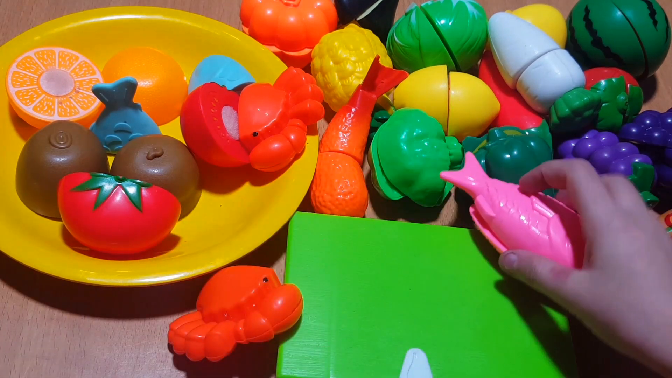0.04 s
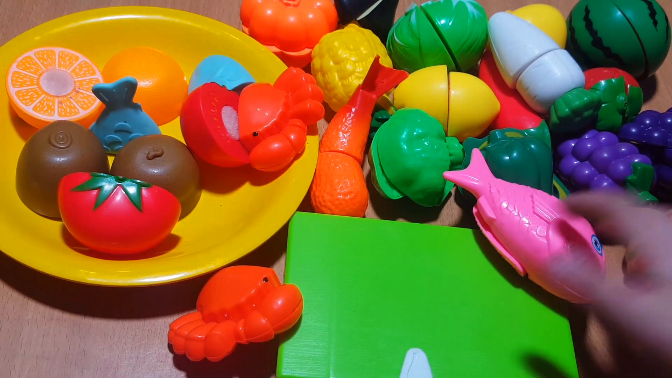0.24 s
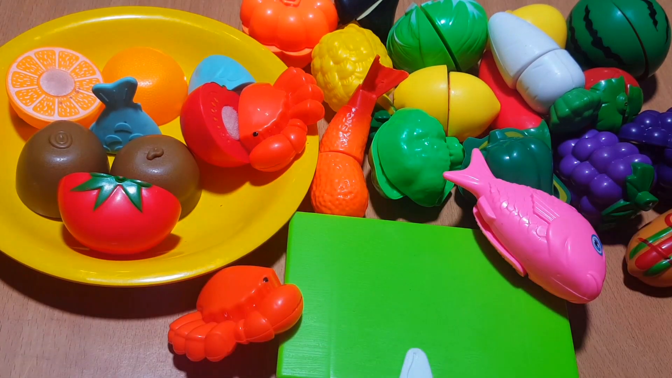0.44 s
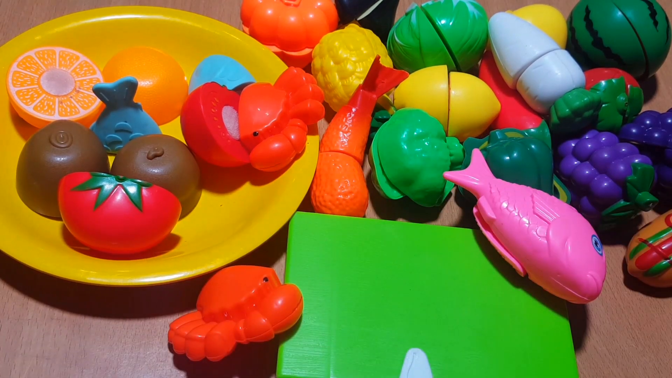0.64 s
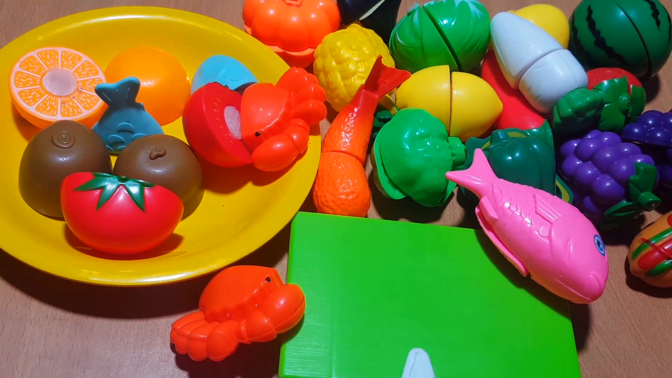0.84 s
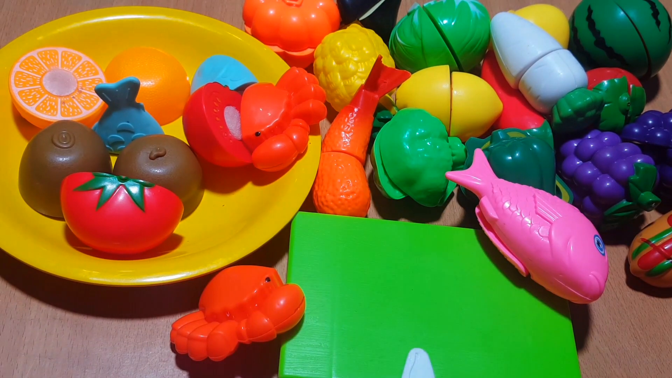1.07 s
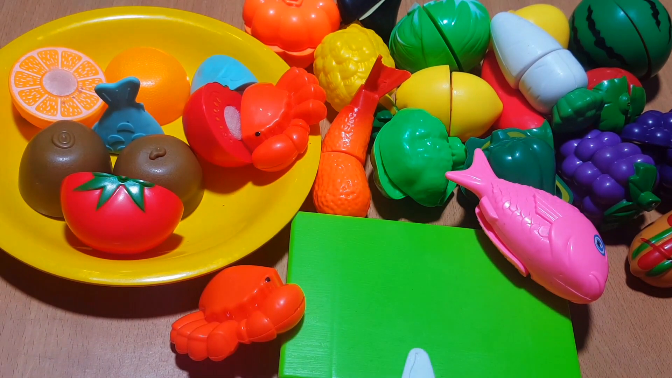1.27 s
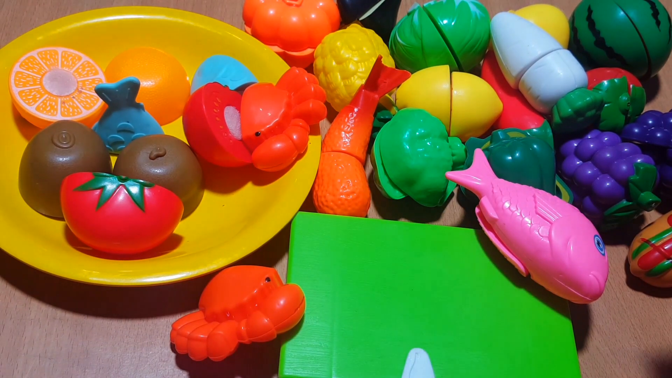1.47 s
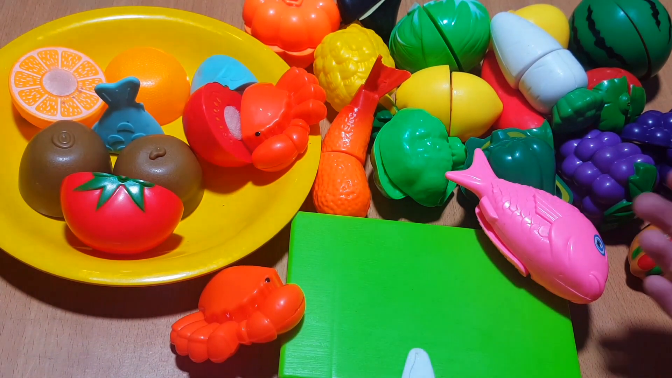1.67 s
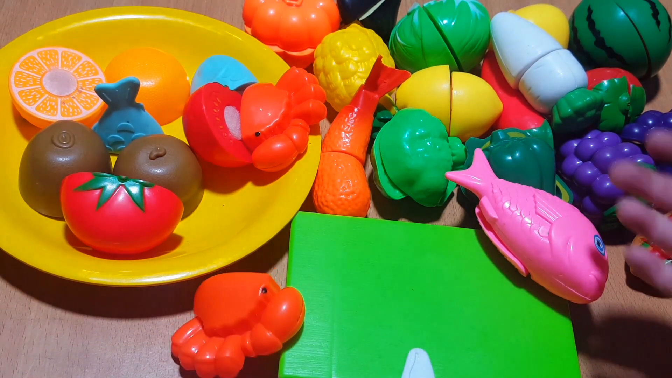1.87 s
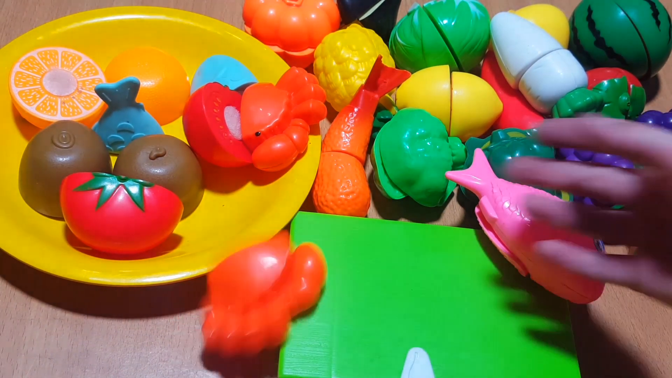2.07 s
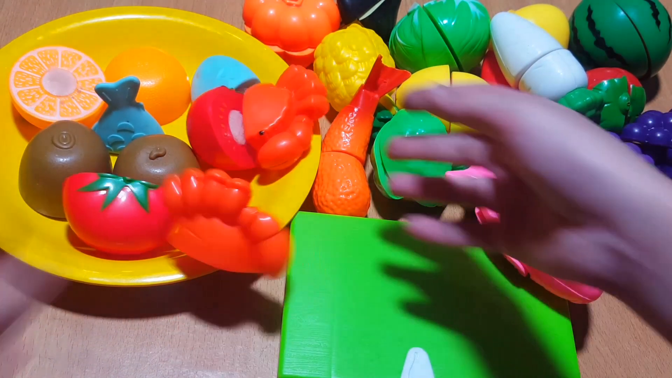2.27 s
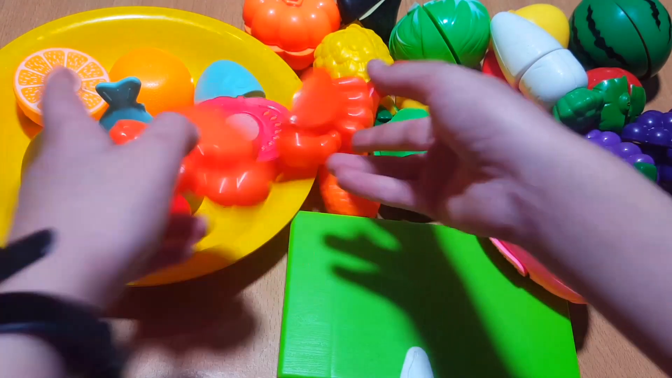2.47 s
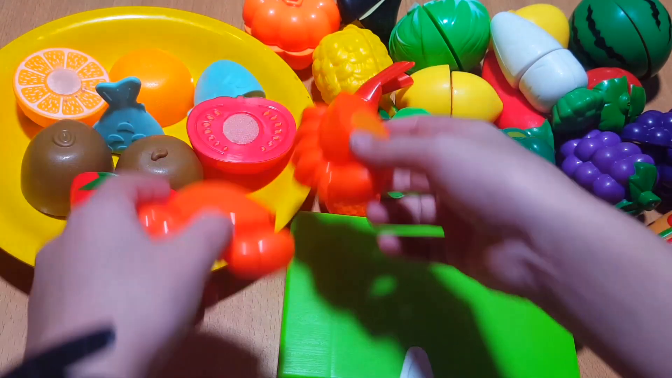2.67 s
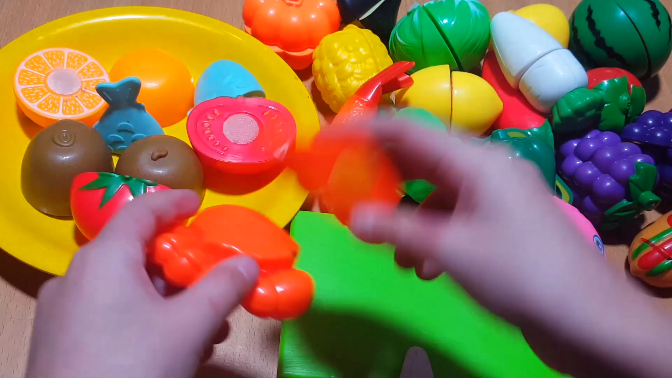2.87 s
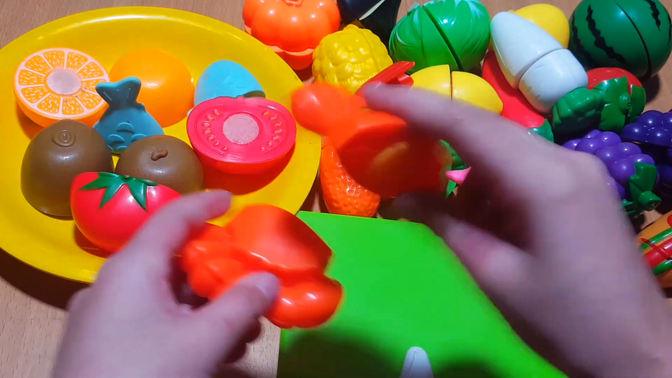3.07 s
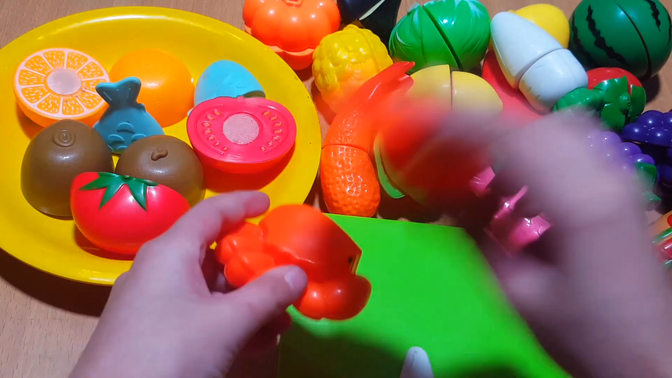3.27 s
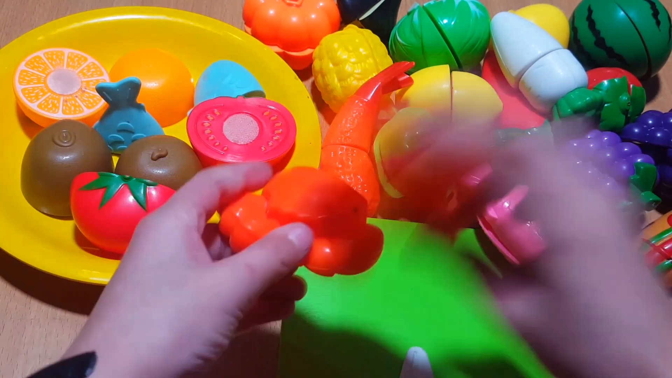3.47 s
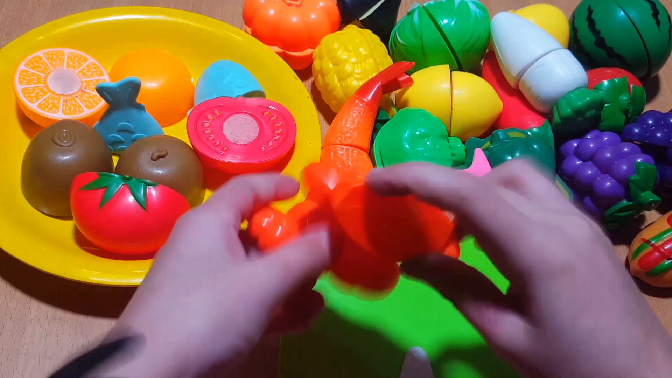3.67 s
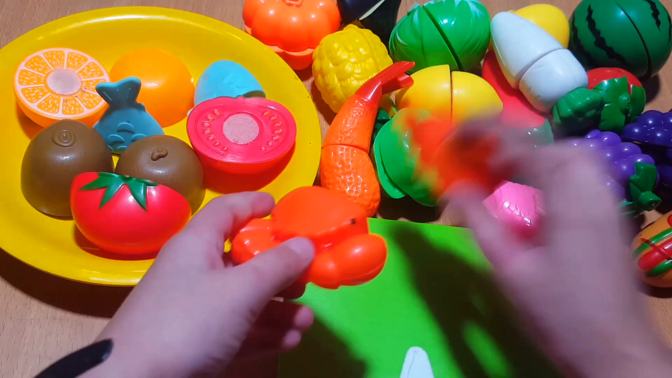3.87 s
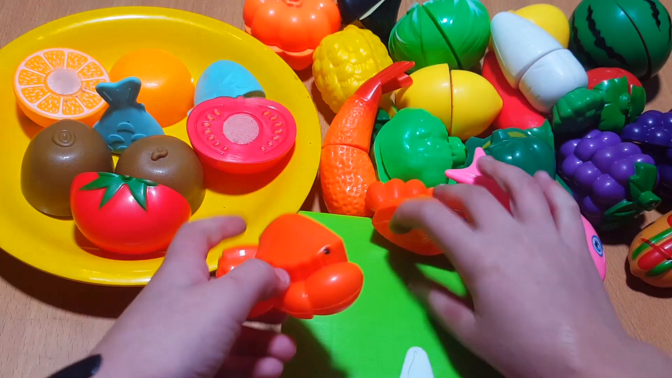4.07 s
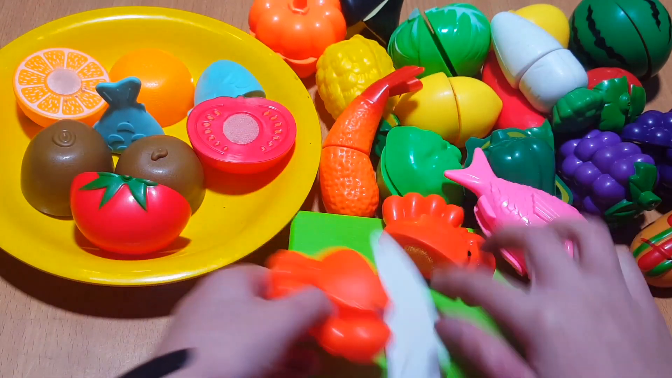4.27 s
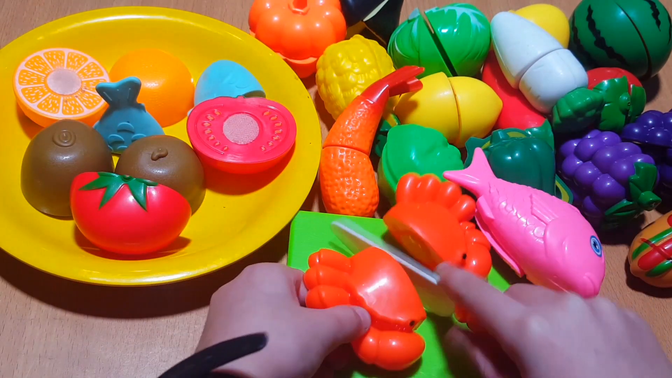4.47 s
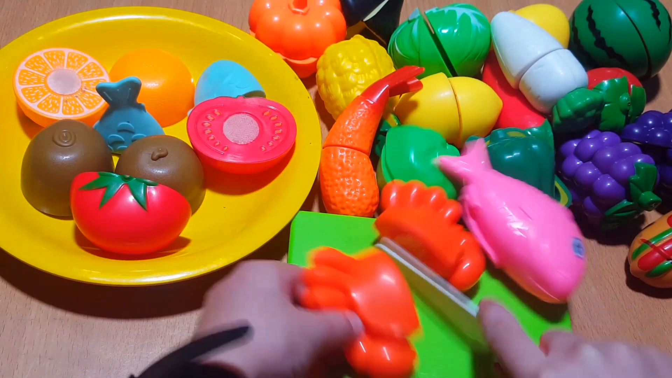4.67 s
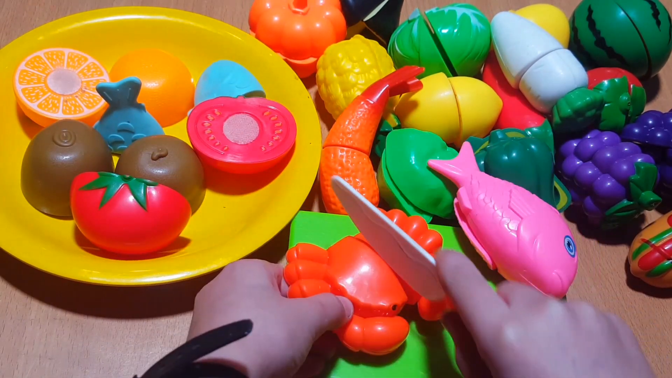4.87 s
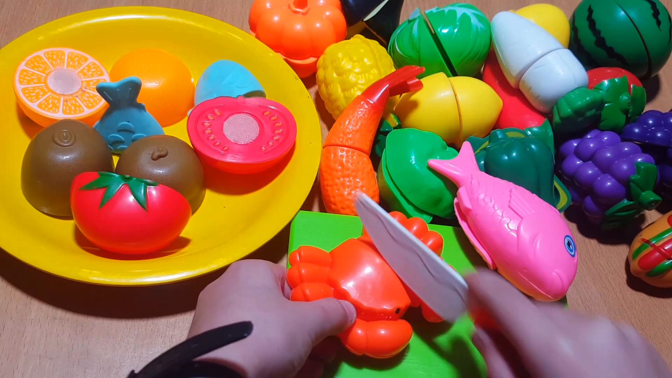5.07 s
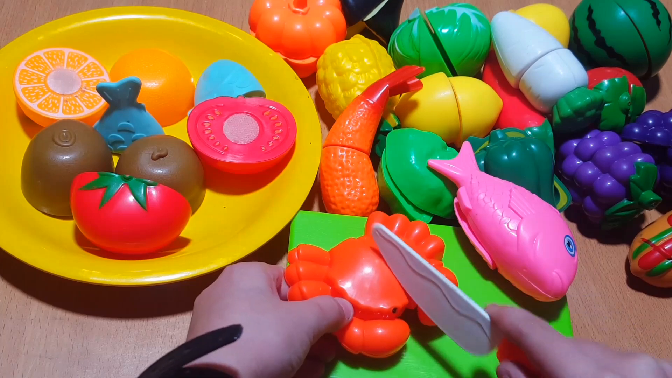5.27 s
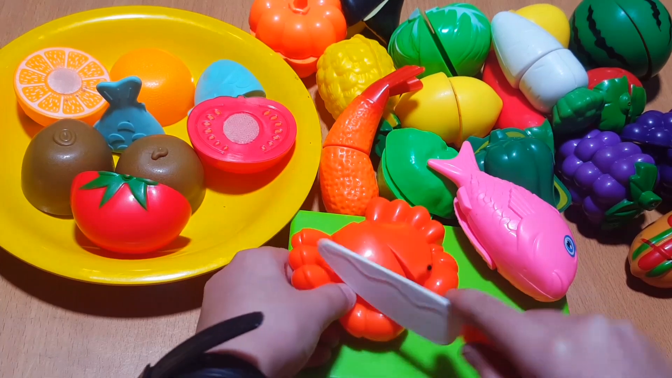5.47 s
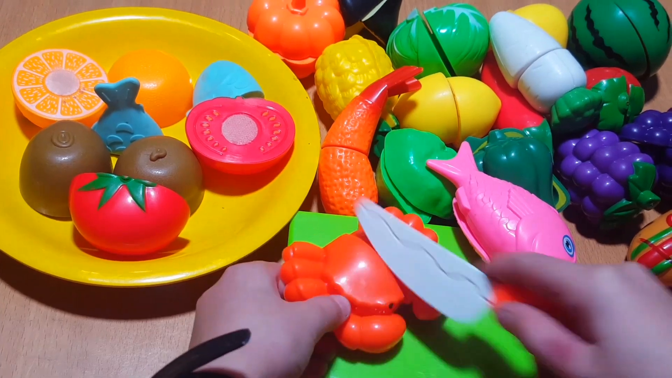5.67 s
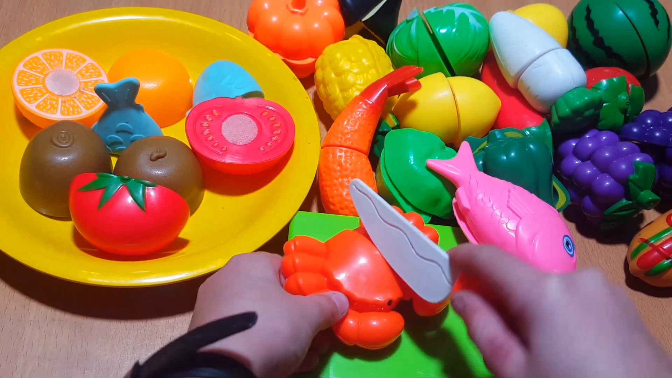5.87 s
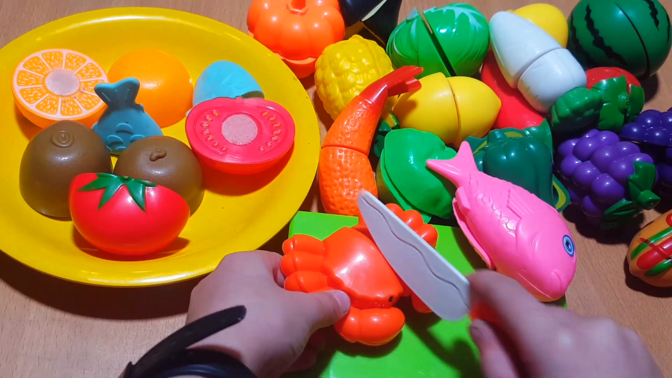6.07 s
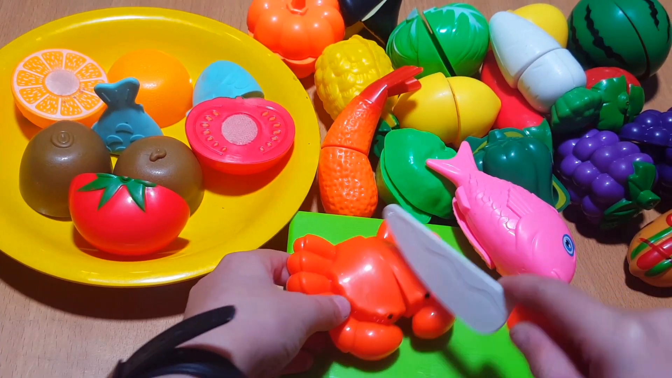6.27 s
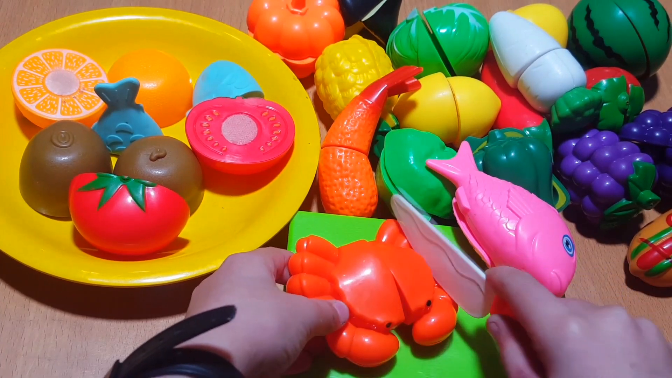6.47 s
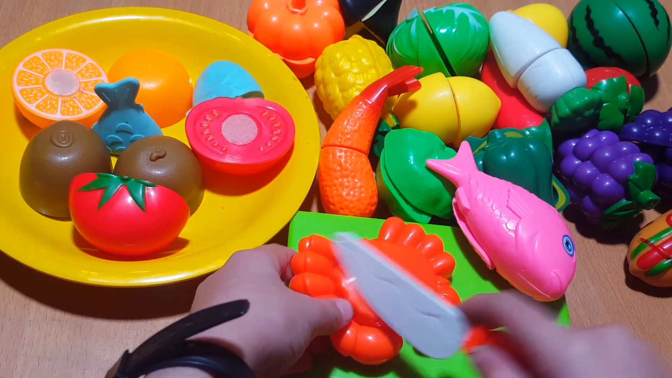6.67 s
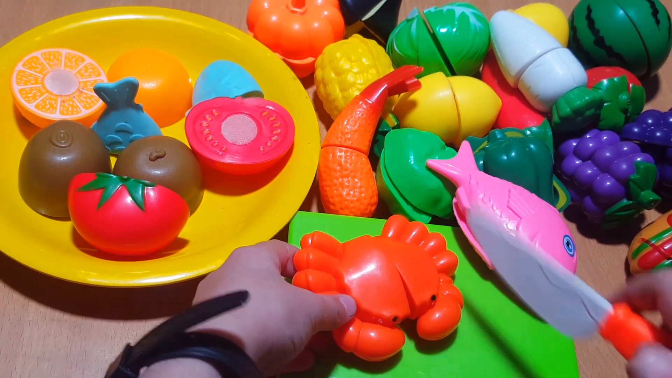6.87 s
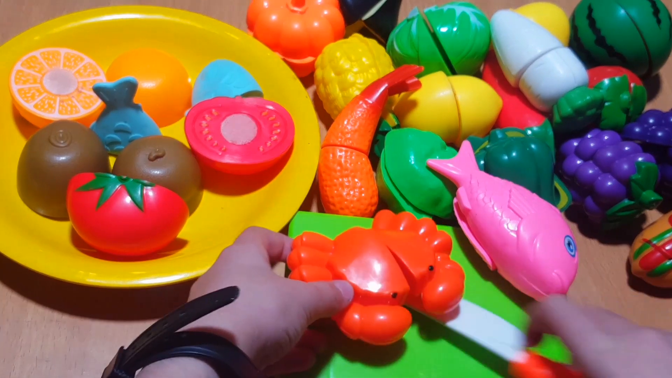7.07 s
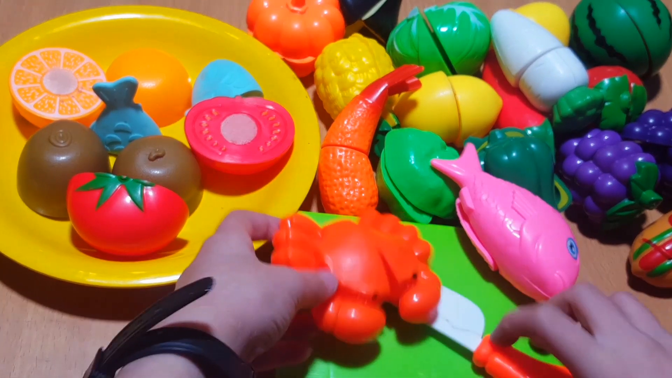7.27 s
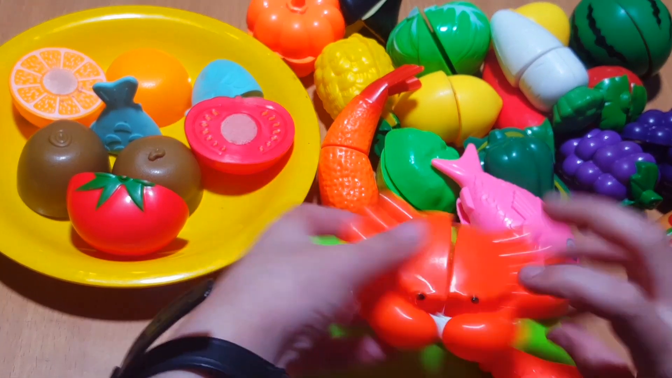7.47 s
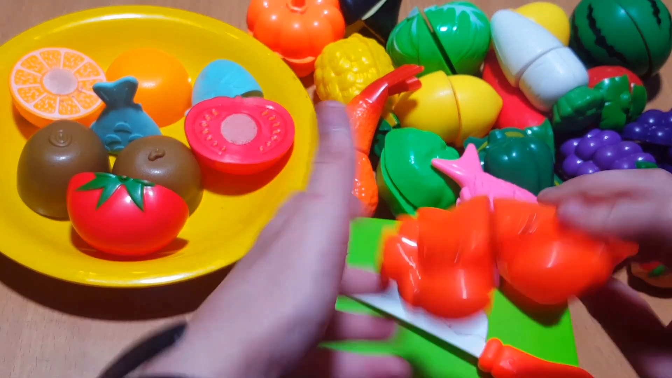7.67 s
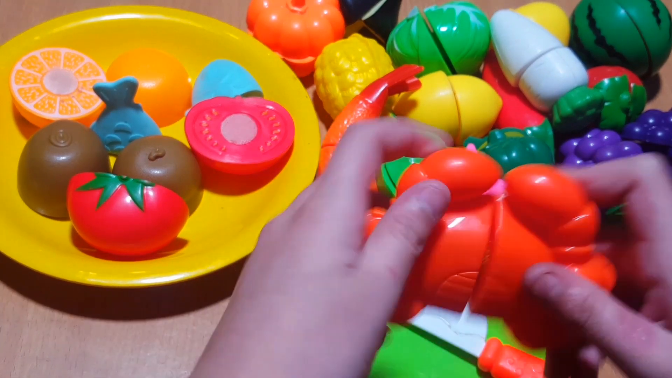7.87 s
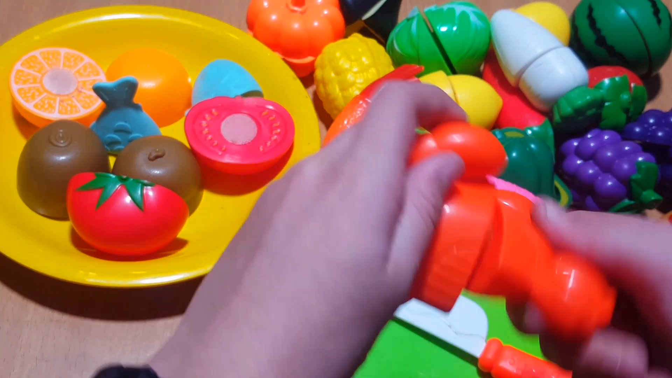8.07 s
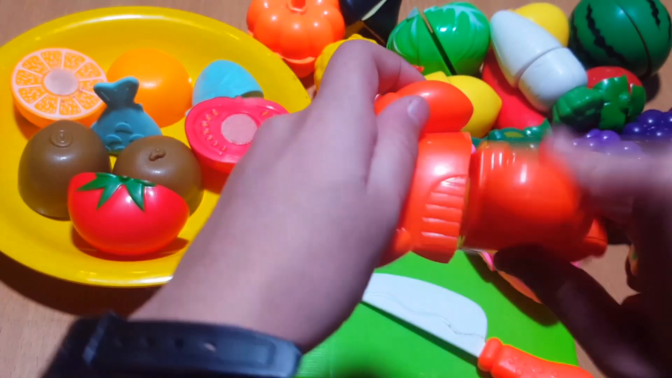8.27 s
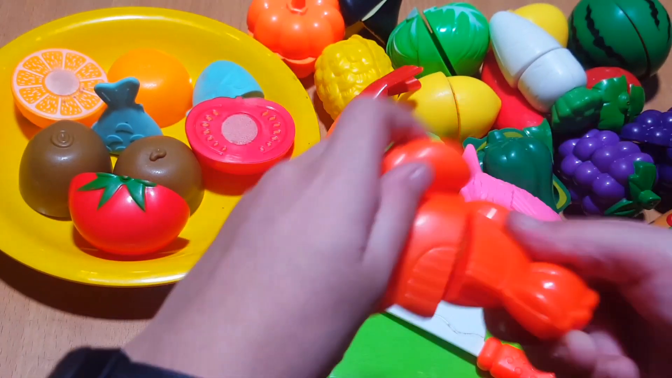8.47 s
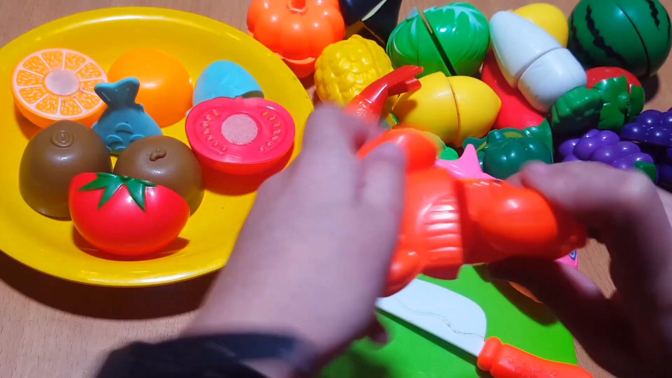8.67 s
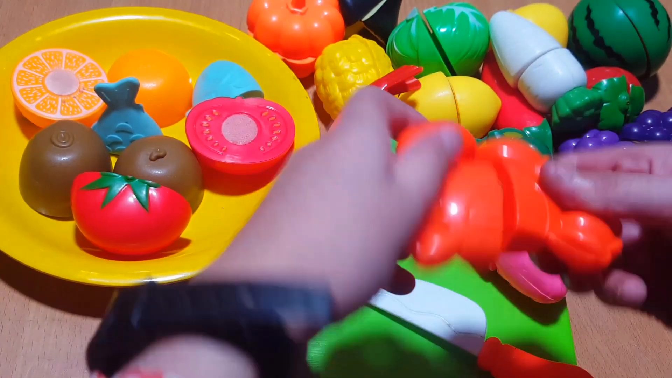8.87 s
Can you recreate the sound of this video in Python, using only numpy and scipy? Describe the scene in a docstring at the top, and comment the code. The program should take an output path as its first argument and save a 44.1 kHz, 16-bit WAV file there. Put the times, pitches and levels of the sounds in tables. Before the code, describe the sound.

Reversed handling of plastic toy crab halves: hook-and-loop rips, hollow knocks, ringing clacks, light knife ticks and a final dry crackle in a small room.

```python
"""Hollow plastic toy food is handled close by in a small room, all played backwards: echoes swell up to each blow.
Knocks (shell resonances, thud and crack) and rips of hook-and-loop pads (dense snaps) come first and recur;
thin metal jingles (decaying modes) and a few low bumps follow. Then an open half shell clacks shut and sings,
a toy knife ticks lightly (short, crack-heavy contacts), and at last a bent pad crackles (snaps paced by strain).
Low room noise and a faint, wavering hum (narrow-band noise) lie under it all."""
import sys
import numpy as np
from scipy import signal
from scipy.fft import rfft, irfft, next_fast_len
from scipy.io import wavfile

SR = 44100
rng = np.random.default_rng(int(sys.argv[2]) if len(sys.argv) > 2 else 0)


def wav_out(sig):
    """Save sig, one row per channel (or a flat mono array), as 16-bit PCM at SR to the path in sys.argv[1]."""
    wavfile.write(sys.argv[1], SR, np.round(np.clip(np.atleast_2d(sig).T, -1, 1) * 32767).astype(np.int16))


N = 393372

# All event times are as heard; sources are built in forward-running order and reversed in scene().
# low part of a contact or drag: (frequency [Hz], relative spectrum level [dB])
THUD_SPECTRUM = [(60, -34.5), (180, -9.5), (330, -10), (540, -4), (750, -6.5), (1100, 3), (2500, -62)]
# hooks and grazing surfaces: (frequency [Hz], relative spectrum level [dB])
HOOK_SPECTRUM = [(1200, -27.5), (2300, 4), (3100, 2), (4500, -0.5), (6000, -5.5), (8000, -5.5),
                 (11000, -10.5), (15000, -23.5)]


def undb(db):
    """Level law: decibels to amplitude gain."""
    return 10 ** (np.asarray(db) / 20)


def sample(s):
    """Time reversal: sample of the forward-running action that is heard at time s."""
    return N - int(s * SR)


def curve(rows, axis=1):
    """Linear interpolation: one column of a table, per sample of the forward-running action."""
    rows = np.array(rows)
    heard_s = np.arange(N)[::-1] / SR
    return np.interp(heard_s, rows[:, 0], rows[:, axis])


def at(points, hz):
    """Constant-ratio spacing: read a spectrum on a log-frequency axis."""
    f, value = np.transpose(points)
    return np.interp(np.log(hz + 1), np.log(f), value)


def unit(x):
    """Power normalisation: scale to rms 1."""
    return x / np.sqrt(np.mean(x ** 2))


def noise(size):
    """Incoherence: two unrelated white noises."""
    return rng.standard_normal((2, size))


def fade(t, t60):
    """Exponential decay: the level falls 60 dB in t60 seconds."""
    return np.exp(-np.log(1000) * t / t60)


def colour(x, points, peaks=()):
    """Linear filtering: a spectrum and resonances shape two signals as mid and side of a left-right pair."""
    # difference between the microphones for near sounds: (frequency [Hz], side re mid [dB])
    side_levels = [(100, -20), (300, -13.5), (600, -6.5), (1200, -5.5), (4000, -0.5), (8000, 0.5)]
    size = next_fast_len(x.shape[1])
    hz = np.arange(size // 2 + 1) * SR / size
    resonance = 1 + sum((undb(db) - 1) / (1 + 2j * (hz - f) / width) for f, width, db in peaks)
    mid, side = rfft(x, size) * undb(at(points, hz)) * resonance
    side = side * undb(at(side_levels, hz))
    left_right = irfft(np.array([mid + side, mid - side]), size)
    return unit(left_right[:, :x.shape[1]])


def ring(modes, t):
    """Modal superposition: decaying sines, detuned a little at each blow, in different phase at each microphone."""
    out = 0
    for hz, db, t60 in modes:
        phase = rng.uniform(0, 2 * np.pi) + 0.34 * rng.standard_normal((2, 1))
        detuned_hz = hz * (1 + 0.0049 * rng.standard_normal())
        out = out + undb(db) * fade(t, t60) * np.sin(2 * np.pi * detuned_hz * t + phase)
    return out


def add(track, s, sound):
    """Superposition: mix a sound in at its moment."""
    start = sample(s)
    track[:, start:start + sound.shape[1]] += sound[:, :N - start]


def stroke(end_s, length_s, swell, stop):
    """Piecewise-linear level [dB]: as heard, one pull swells, holds and stops; slopes in dB per s."""
    start_s = end_s - length_s
    return curve([(start_s - 1, -swell), (start_s, 0), (end_s, 0), (end_s + 1, -stop)])


def knocks():
    """Impact excitation: contact rings the shell, with thud and crack; returns direct sound and room feed."""
    # hollow of an open half shell: (frequency [Hz], width [Hz], lift [dB])
    cup_peaks = [(2236, 39, 29), (1690, 120, 6.5), (2800, 61, 7), (3970, 200, 3)]
    # spectrum of its ring: (frequency [Hz], relative spectrum level [dB])
    cup_spectrum = [(800, -46), (1500, -9), (2200, 5), (4000, 4.5), (6500, -4.5), (10000, -19.5)]
    # resonances of the plastic shells: (frequency [Hz], width [Hz], lift [dB])
    shell_peaks = [(941, 39, 11.5), (1088, 61, 7.5), (1470, 58, 7.5), (1620, 30, 14.5), (2234, 110, 9),
                   (2786, 96, 1)]
    # chopping board under the toys: (frequency [Hz], width [Hz], lift [dB])
    board_peak = (520, 23, 9.6)
    # a struck shell sounds around its own pitch: (multiple of the pitch [1], relative spectrum level [dB])
    pitch_hump = [(.2, -42.5), (.42, -21.5), (.72, -4.5), (1, -0.5), (1.5, -7.5), (2.5, -12), (4, -27.5),
                  (8, -51.5)]
    # crack of the contact: (frequency [Hz], relative spectrum level [dB])
    crack_spectrum = [(1200, -32), (2400, 4), (3100, -2), (4200, -3.5), (6000, -8.5), (7500, -26),
                      (12000, -51.5)]
    # treble of the crack: (frequency [Hz], relative spectrum level [dB])
    treble_spectrum = [(3500, -32), (6000, -2), (7500, -0.5), (10000, -1.5), (14500, -9), (16000, -30.5)]

    cup_t60_s, spot_scatter, left_re_right_db = .27, .03, 0.2
    balance = undb(np.array([[left_re_right_db], [-left_re_right_db]]) / 2)
    direct, feed = np.zeros((2, 2, N))
    t, long_t = np.arange(2 ** 12) / SR, np.arange(3 * 2 ** 12) / SR
    attack = int(.008 * SR)

    def burst(points, envelope, peaks=()):
        """Filtered noise pulse: rms 1 over the first 8 ms."""
        x = colour(noise(len(envelope)), points, peaks) * envelope
        return x * (x[:, :attack] ** 2).mean() ** -.5

    def contact(t60, hold):
        """Stretched decay: the blow holds its level briefly, then falls away."""
        decay = np.exp(-np.log(1000) * (t / t60) ** hold)
        return decay * (1 - np.exp(-t / .0005))

    for s, db, hz, thud_db, crack_db, treble_db, t60, hold, cup_db in contacts():
        _, thud_hz, crack_hz, _, room_db = support(s)
        # no two contacts fall on the same spot
        spot = np.exp(spot_scatter * rng.standard_normal(2))
        thud_hz, crack_hz = np.array([thud_hz, crack_hz]) * spot

        hump = [(multiple * hz, level_db) for multiple, level_db in pitch_hump]
        body = burst(hump, contact(0.76 * t60, hold), [(hz, 0.051 * hz, 15)] + shell_peaks)
        # the main mode outlasts the rest
        body = body + undb(-10.5) * ring([(hz, 0, t60)], t)
        thud = burst(THUD_SPECTRUM, contact(t60, hold), [(thud_hz, 0.043 * thud_hz, 14), board_peak])
        crack = burst(crack_spectrum, contact(0.46 * t60, hold), [(crack_hz, 0.03 * crack_hz, 11)])
        crack = crack + undb(treble_db) * burst(treble_spectrum, contact(0.49 * t60, hold))
        blow = undb(db) * (body + undb(thud_db) * thud + undb(crack_db) * crack)
        cup = undb(db + cup_db) * burst(cup_spectrum, fade(long_t, cup_t60_s), cup_peaks)
        add(direct, s, blow * balance)
        add(direct, s, cup)
        add(feed, s, blow * undb(room_db))

        # in the forward action the surfaces graze each other just before they meet
        graze = colour(noise(attack), HOOK_SPECTRUM) * np.linspace(0, 1, attack) ** 2
        add(direct, s + attack / SR, undb(db + crack_db - 10.0) * graze)
    return direct, feed


def contacts():
    """Impact parameters: (s, level, pitch, thud, crack, treble, t60, hold, cup ring) of knocks, ticks, clacks."""
    # knocks of shell on shell: (time [s], level [dB], shell pitch [Hz], thud re level [dB],
    # crack re level [dB], treble re crack [dB], nominal t60 [s])
    knock_rows = [(0.1661, -38, 1390, -0.5, -5, -11, 0.12), (.2142, -30.5, 1480, -6, 4, -16, 0.075),
                  (0.2972, -31.5, 1470, -6.5, -11, -3, 0.033), (0.3225, -39, 1340, -4, -5, -9, 0.13),
                  (1.7319, -40, 1006, -7, -29, 7.5, 0.052), (1.8005, -35.5, 905, -6, -22, 0, 0.048),
                  (1.843, -30.5, 1020, -6, -24, -6, .05), (2.0488, -27, 980, -14.5, -24, 1, 0.069),
                  (2.135, -26, 1540, -7.5, 1.5, -7, .08), (2.149, -13, 1156, -12.5, -26, -15, 0.016),
                  (2.1734, -16, 1483, -13.5, 1, -10.5, .045), (2.2262, -30, 1114, -42, 0.5, -10, 0.079),
                  (2.2548, -22, 1110, -28, -7, -14, 0.076), (2.4202, -19.5, 2140, -19.5, 4.5, -11, .07),
                  (2.499, -12, 2340, -10, -3.5, -7.5, 0.035), (2.527, -21, 2290, -20.5, 0.5, -11, .07),
                  (2.552, -19, 2110, -22.5, -8, -4, .085), (2.5662, -10, 2367, -41.5, -15, -0.5, .026),
                  (2.6177, -16, 2140, -20, -12.5, -2.5, .04), (4.174, -35.5, 1190, -18, -2, -18, 0.041),
                  (4.2194, -23.5, 1635, -10.5, -0.5, -6.5, 0.076),
                  (4.229, -29.5, 2490, -31.5, -10, -11, .07), (4.265, -28.5, 2550, -15, -10, -6, 0.029),
                  (4.2817, -31.5, 1367, -9, -2, -7, 0.11), (4.316, -26, 1316, -17.5, -0.5, -10, 0.061),
                  (4.3751, -28, 1030, -16.5, -2.5, -5.5, 0.051), (4.398, -21.5, 1390, -15, -9, -19, .04),
                  (4.416, -21.5, 1273, -18, -4, -20, .04), (4.4495, -24.5, 2520, -2, 0.5, -10, 0.065),
                  (4.469, -24.5, 1168, -25, -10, -15, 0.053), (4.565, -41, 2400, -5, -0.5, -3.5, 0.023),
                  (4.6397, -30, 1330, -12, -8.5, -16, .05), (4.678, -29.5, 2720, -3, 2, -14, 0.049),
                  (4.7724, -21, 1330, -26, -13, -7, 0.09), (4.8099, -9.5, 1114, -8, -5, -5.5, 0.031),
                  (4.8259, -21.5, 2680, -16, 4, -6.5, 0.25), (5.0683, -38, 1200, -15, 1, 3, 0.047),
                  (5.1765, -35, 1290, 1, 9.5, -6, 0.086), (5.415, -31, 1197, -20, -2.5, -22, .1),
                  (5.4429, -33.5, 1385, -28, -4.5, -10.5, 0.056), (5.5466, -38, 1370, -1.5, -1.5, -13, 0.2),
                  (5.725, -19.5, 1050, -2, 5.5, -6.5, 0.053), (5.7458, -39, 870, -1, 3.5, -9, 0.093),
                  (6.3259, -27, 1345, 1, -13, 0, 0.052), (6.3362, -16, 1470, -19, -3.5, -13.5, 0.013),
                  (6.366, -33, 995, -5, -19, -10, 0.024), (6.4431, -23, 2045, -15.5, -14, 2.5, 0.035),
                  (6.5707, -17.5, 1017, -16, 2.5, -12.5, 0.027), (6.583, -22, 1330, -28, -9, -5, 0.13),
                  (6.644, -23, 1534, -23, -0.5, -9, 0.024), (6.8023, -22.5, 2240, -10, -8, -2, 0.052),
                  (7.0175, -13.5, 1154, -13, -5.5, -9.5, .06), (7.036, -12, 1385, -11.5, -12, -9.5, 0.039),
                  (7.0591, -26.5, 1410, -3.5, -5, -6.5, 0.047),
                  (7.0968, -18.5, 2100, -11.5, 0, -6.5, 0.042), (7.153, -31.5, 2160, -4.5, -4, -20, 0.054),
                  (7.3817, -15, 1256, -10, -5, -5.5, 0.078), (7.3937, -17.5, 2370, -23, -15, -1, 0.028),
                  (7.4698, -17.5, 1300, -10.5, 3, -1, 0.093), (7.4815, -16, 1390, -21, -6, 4.5, 0.029),
                  (7.515, -18.5, 1397, -8.5, -9, 4.5, 0.1), (7.5216, -19, 2100, -5, -1.5, 1.5, 0.057),
                  (7.6113, -21.5, 2220, -24.5, -14, -5, 0.051), (7.6641, -35.5, 2340, -14, -14, -3, 0.052),
                  (7.7186, -40, 1600, -22, -19, 0, 0.039), (7.892, -30.5, 2240, -28, -11.5, -3, .03),
                  (8.8866, -37.5, 1710, -26, -2.5, -4, 0.12)]
    # light, dry ticks of the toy knife: (time [s], level [dB])
    tick_rows = [(4.841, -37), (4.874, -38.5), (4.8929, -44), (4.9255, -46.5), (5.1198, -40), (5.775, -46),
                 (5.807, -48), (5.8688, -34.5), (5.909, -47)]
    # the open half shell clacks shut, holds its level for a moment and sings:
    # (time [s], level [dB], shell pitch [Hz], crack re level [dB], cup ring re level [dB])
    clack_rows = [(3.1064, -15, 2220, -10, -9), (3.3343, -10.5, 2220, -9.5, -12.5),
                  (3.5798, -12, 1850, -11, -7), (3.8326, -11, 2115, -13, -17)]

    # hold is the exponent of the decay: 1 is plain, more holds the level up longer before a steeper fall
    knock_hold, clack_hold = 1.13, 2.7
    tick_hz, tick_thud_db, tick_crack_db, tick_treble_db, tick_t60_s = 1330, -8.5, 10, -3, .026
    clack_thud_db, clack_treble_db, clack_t60_s = -30.5, 3, 0.028
    # the halves brush each other just before a clack in the forward action
    brush_lead_s, brush_re_clack_db = .012, -26.5

    tick_timbre = (tick_hz, tick_thud_db, tick_crack_db, tick_treble_db, tick_t60_s)
    ticks = [(s, db, *tick_timbre) for s, db in tick_rows]
    rows = [(*row, knock_hold, support(row[0])[3]) for row in knock_rows + ticks]
    for s, db, hz, crack_db, cup_db in clack_rows:
        timbre = (hz, clack_thud_db, crack_db, clack_treble_db, clack_t60_s, clack_hold, cup_db)
        rows.append((s, db, *timbre))
        rows.append((s + brush_lead_s, db + brush_re_clack_db, *timbre))
    return rows


def support(s):
    """Boundary conditions: the table row of the place where the toy is at time s."""
    # contacts take their colour from the place (plate, lifted, set down, under the knife, cut,
    # picked up, held): (start [s], mean thud pitch [Hz], mean crack pitch [Hz],
    # cup ring of knocks and ticks re level [dB], room feed re level [dB])
    places = [(0, 731, 3000, -31, -3.5), (3, 435, 3910, -21.5, -7.5), (4.1, 641, 3097, -29, -5.5),
              (5.1, 576, 3260, -20, -7.5), (5.6, 568, 3726, -17, -7), (6.9, 447, 3700, -22, -6.5),
              (7.55, 460, 3580, -25, -8)]
    return places[sum(s >= row[0] for row in places[1:])]


def snaps(rate, spread_db, t60):
    """Random impulse process: hooks let go one by one in tiny noise bursts of unequal size."""
    size = undb(spread_db * np.minimum(rng.exponential(size=N), 4))
    pops = (rng.random(N) < rate / SR) * size ** 2
    power = signal.lfilter([1], [1, -fade(1 / SR, t60) ** 2], pops)
    return noise(N) * np.sqrt(power + 1e-12)


def rip():
    """Stick-slip excitation: dense hook snaps, heard directly and through the hollow shells."""
    # pads and shells dragged over each other: (end [s], length [s], shell level [dB], hook snaps re shell [dB])
    drags = [(0.205, 0.082, -45, -7), (2.145, 0.019, -29, -12), (2.168, 0.0074, -21.5, -4.5),
             (2.415, 0.028, -18, -10.5), (2.49, 0.053, -18, -3), (2.61, 0.14, -28, -14.5),
             (4.441, 0.26, -39.5, -10.5), (4.66, .19, -45.5, -16.5), (4.727, 0.051, -31, -9.5),
             (4.807, 0.05, -15, -5), (4.822, 0.0056, -27.5, 9.5), (5.202, .12, -54.5, 3),
             (5.557, .09, -47.5, -8.5), (5.689, 0.01, -28.5, -10), (5.86, 0.16, -55, 7.5),
             (6.284, 0.047, -38.5, -2.5), (6.566, 0.047, -29, -6.5), (7.182, 0.081, -34, -9.5),
             (7.315, .14, -44, -5.5), (7.377, 0.0049, -20.5, -2), (7.459, 0.008, -18.5, -5.5),
             (7.518, 0.042, -29, 4.5)]
    # shell sound: (frequency [Hz], relative spectrum level [dB])
    body_spectrum = [(300, -31), (600, -25), (850, 1.5), (1400, 4), (2300, 5), (3200, -5.5), (5000, -30.5),
                     (9000, -56)]
    # the two shells that a pad joins: (frequency [Hz], width [Hz], lift [dB])
    joined_peaks = [(923, 38, 14), (1135, 86, 17), (1350, 250, 9.5), (1585, 37, 11.5), (2110, 52, 13.5),
                    (2840, 77, 6), (3710, 50, 9.5)]
    swell_db_per_s, stop_db_per_s = 752.5, 1202

    shell_db = hooks_db = -120
    for end_s, length_s, db, snaps_db in drags:
        drag = db + stroke(end_s, length_s, swell_db_per_s, stop_db_per_s)
        shell_db = np.maximum(shell_db, drag)
        hooks_db = np.maximum(hooks_db, drag + snaps_db)
    grains = snaps(rate=1500, spread_db=1.0, t60=0.0047)
    shell = colour(grains, body_spectrum, joined_peaks) + undb(-25.5) * colour(grains, THUD_SPECTRUM)
    return undb(shell_db) * shell + undb(hooks_db) * colour(grains, HOOK_SPECTRUM)


def flex():
    """Strain-dependent event rate: lone snaps under light strain, a dense rasp under a hard pull."""
    # pulls on a joined pad bent to and fro in the hands: (end [s], length [s], level before the mix [dB])
    pull_rows = [(8.102, 0.0079, -19), (8.31, 0.061, -13.5), (8.488, 0.083, -14.5), (8.707, 0.091, -14.5),
                 (8.856, 0.037, -14)]
    # grip that keeps light strain between pulls: (end [s], length [s], level before the mix [dB])
    grip_row = (8.87, 0.915, -41)
    # single hooks letting go: (time [s], level before the mix [dB])
    lone_snaps = [(7.916, -35), (7.938, -34), (8.003, -28.5), (8.03, -29), (8.113, -22.5), (8.154, -26.5),
                  (8.228, -15.5), (8.381, -19), (8.528, -28.5), (8.583, -23), (8.597, -17)]
    # hooks of the bent pad: (frequency [Hz], relative spectrum level [dB])
    flex_spectrum = [(200, -26), (600, -22.5), (1200, -11), (2200, -7.5), (3400, -2.5), (5000, -1.5),
                     (6100, -2.5), (7100, -10), (9300, -4.5), (10600, -7.5), (12000, -5.5), (15000, -12)]
    # the shell behind the pad: (frequency [Hz], width [Hz], lift [dB])
    pad_peaks = [(3380, 40, 6), (3770, 53, 5.5), (5040, 96, 2.5), (5980, 61, 6)]
    swell_db_per_s, stop_db_per_s = 484, 1096

    pulls = []
    for end_s, length_s, db in pull_rows + [grip_row]:
        pulls.append(db + stroke(end_s, length_s, swell_db_per_s, stop_db_per_s))
    strain_db = np.maximum(np.max(pulls, axis=0), -72)
    # snaps per second
    rate = np.minimum(2600 * undb(.95 * (strain_db + 20)), 4500)
    grains = snaps(rate=rate, spread_db=3.7, t60=.002) / np.sqrt(rate)
    # a slack pad is silent
    strained = strain_db > strain_db[-1] + 3
    crackle = colour(grains * strained, flex_spectrum, pad_peaks) * np.sqrt(strained.mean())
    out = undb(strain_db) * crackle

    t = np.arange(2 ** 8) / SR
    for s, snap_db in lone_snaps:
        snap = colour(noise(len(t)), flex_spectrum, pad_peaks) * fade(t, 0.018)
        add(out, s, undb(snap_db) * unit(snap))
    return out


def jingles():
    """Free vibration: thin, high modes of a small piece of metal."""
    # (time [s], level [dB])
    jingle_rows = [(1.226, -43.5), (1.486, -46), (1.8, -54), (2.041, -44)]
    # modes of the metal: (frequency [Hz], level [dB], t60 [s])
    metal_modes = [(7060, -9.5, 0.15), (6800, -21, 0.42), (11160, -9, 0.25), (11800, -11, 0.18)]
    t = np.arange(SR // 2) / SR
    out = np.zeros((2, N))
    for s, db in jingle_rows:
        add(out, s, undb(db) * ring(metal_modes, t))
    return out


def bumps():
    """Damped oscillation: dull low thumps of two modes each, nearly alike at both microphones."""
    # (time [s], level [dB], pitch [Hz], t60 [s])
    bump_rows = [(0.895, -33.5, 75.5, 0.18), (4.15, -51, 41.5, 0.97), (4.919, -47, 42.4, 0.65)]
    t = np.arange(SR // 2) / SR
    out = np.zeros((2, N))
    for s, db, hz, t60 in bump_rows:
        modes = [(hz, 0, t60), (0.91 * hz, -6, t60 / 2)]
        add(out, s, undb(db) * ring(modes, t))
    return out


def room(feed, wet_db, build_s):
    """Diffuse reverberation: convolution with noise that builds up and decays at a rate set by frequency."""
    # decay of the echo: (frequency [Hz], t60 [s])
    decay_times = [(300, 0.31), (1200, 0.2515), (4000, 0.2121), (12000, 0.29)]
    # colour of the echo: (frequency [Hz], relative level [dB])
    echo_spectrum = [(150, -4.5), (600, 3.5), (1200, 0), (4000, 1.5), (12000, -3.5)]
    t = np.arange(2 ** 15) / SR
    hz = np.arange(len(t) // 2 + 1) * SR / len(t)
    spectrum = rfft(noise(len(t))) * undb(at(echo_spectrum, hz))
    centres = [f for f, _ in decay_times]
    tail = 0
    # overlapping bands, each with its own decay
    for share, (_, t60) in zip(np.eye(len(centres)), decay_times):
        band = irfft(spectrum * at(list(zip(centres, share)), hz))
        tail = tail + band * fade(t, t60)
    tail = unit(tail * (1 - np.exp(-t / build_s))) / np.sqrt(len(t))
    echo = signal.fftconvolve(feed, tail, axes=1)[:, :N]
    # the microphones sit close together, so each also hears the other's echo
    return undb(wet_db) * (echo + 0.069 * echo[::-1])


def background():
    """Stationary noise spectra: low room noise and a narrow band that wavers as a hum, under one slow level."""
    # room noise: (frequency [Hz], relative spectrum level [dB])
    floor_spectrum = [(15, -47.5), (25, -22), (69, -8.5), (135, -8), (172, 0), (231, -11), (529, -15),
                      (588, -18.5), (729, -20.5), (1280, -25.5), (6540, -44.5), (7090, -44), (10600, -45.5),
                      (11500, -43), (15000, -49.5)]
    # common level of noise and hum before their own gains: (time [s], level [dB])
    floor_levels = [(0, -45.5), (1.1, -45), (1.9, -53.5), (2.8, -54.5), (3.7, -47.5), (4.5, -57),
                    (4.9, -45.5), (6.1, -44), (7.3, -43.5), (7.6, -46), (8.1, -43.5), (8.92, -43)]
    hum_hz, hum_db = 172.1, -8
    hum_spectrum = [(100, -70), (hum_hz - 20, -22), (hum_hz, 0), (hum_hz + 20, -22), (280, -70)]
    hum = colour(noise(N), hum_spectrum, [(hum_hz, 5, 10), (140, 5, 26)])
    floor = colour(noise(N), floor_spectrum)
    return undb(curve(floor_levels)) * (undb(-1.0) * floor + undb(hum_db) * hum)


def scene():
    """Superposition and time reversal: all sources and the echo, turned back to front."""
    direct, feed = knocks()
    ripping, flexing = rip(), flex()
    room_feed = feed + undb(-5.5) * ripping + undb(-10) * flexing
    echo = room(room_feed, wet_db=-4.5, build_s=0.0043)
    handling = direct + ripping + undb(-2.5) * flexing + jingles() + bumps()
    return (handling + echo + background())[:, ::-1]


def record(dry):
    """Saturation and band limiting: round the loudest peaks and cut the top."""
    rounded = np.tanh(.9 * dry) / .9
    top_hz = 14900
    low_pass = signal.ellip(8, .1, 50, top_hz, fs=SR, output="sos")
    return signal.sosfiltfilt(low_pass, rounded)


dry = scene()
out = record(dry)
wav_out(out)
```